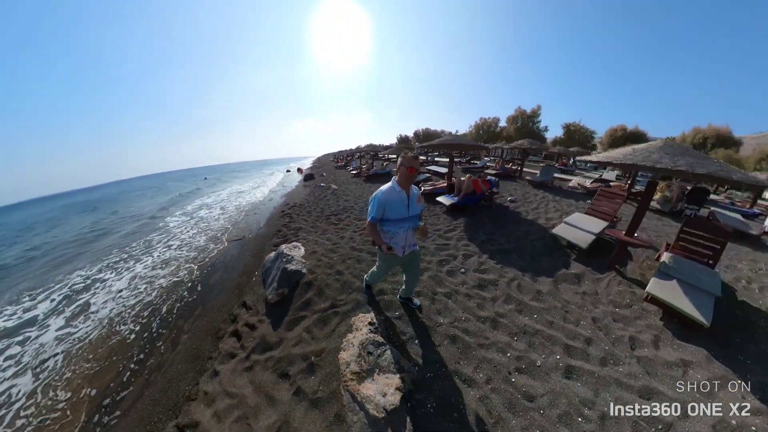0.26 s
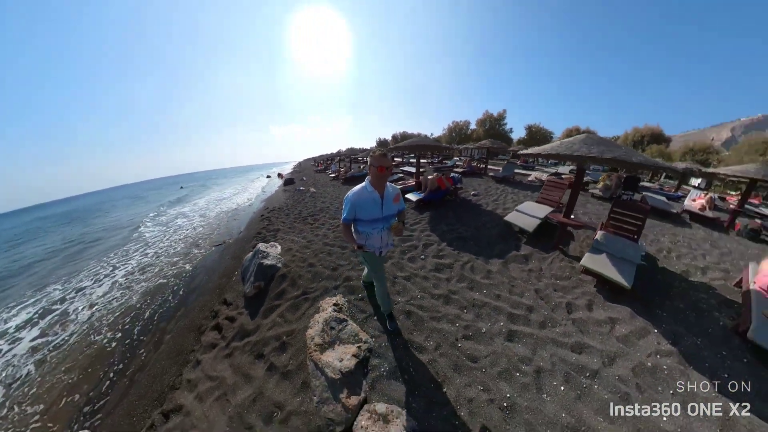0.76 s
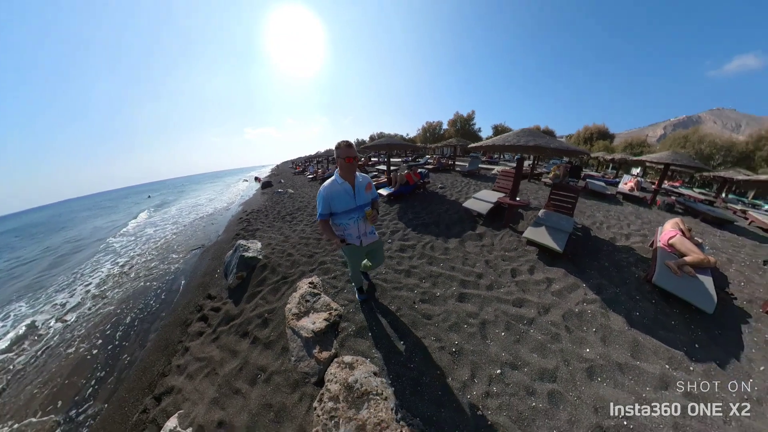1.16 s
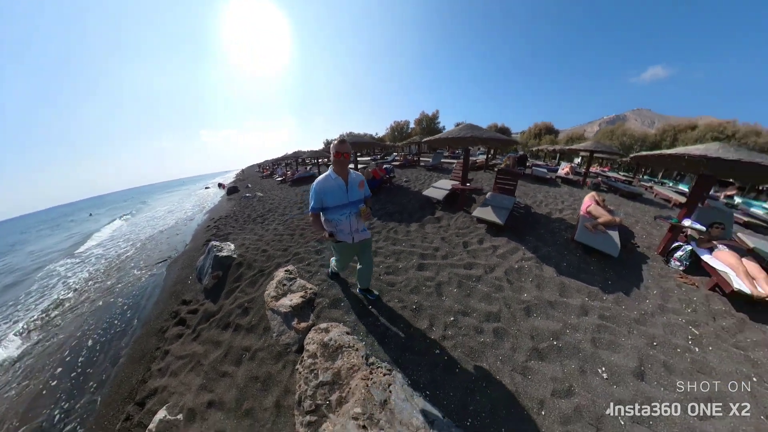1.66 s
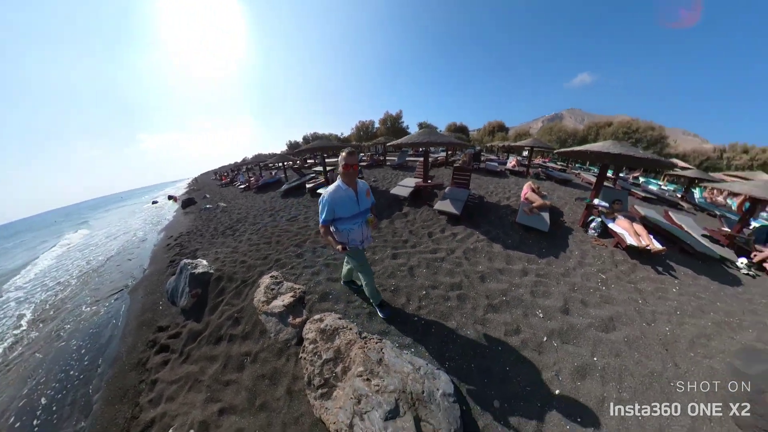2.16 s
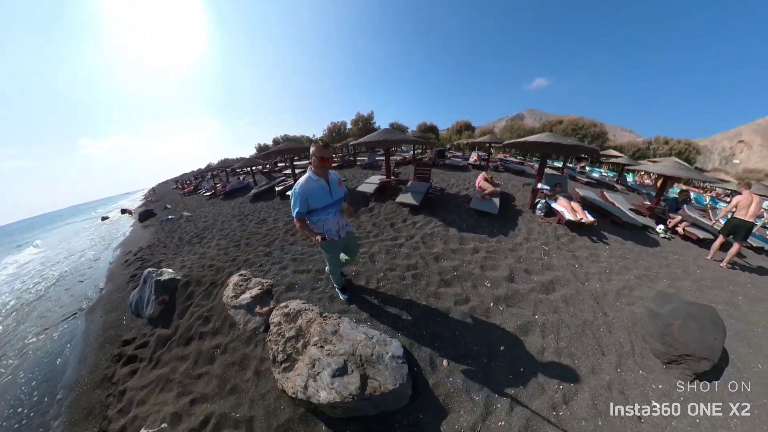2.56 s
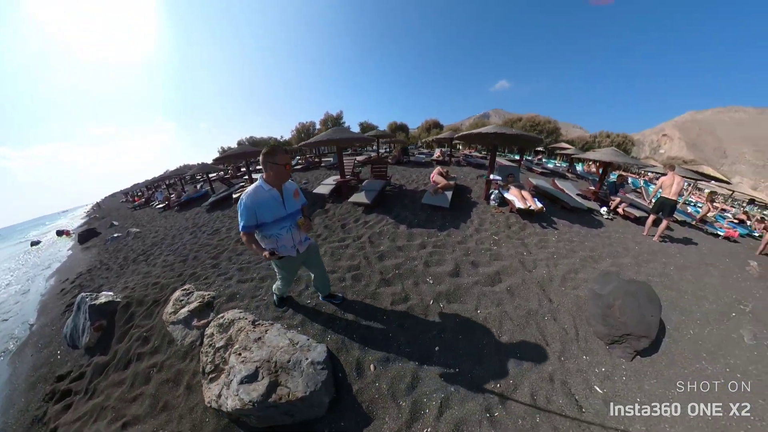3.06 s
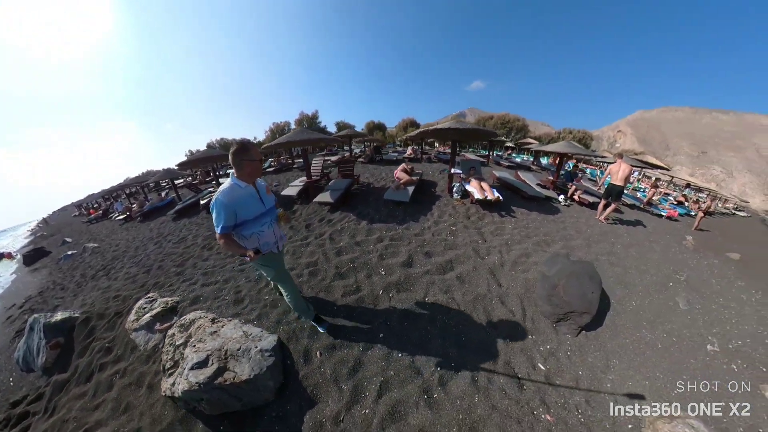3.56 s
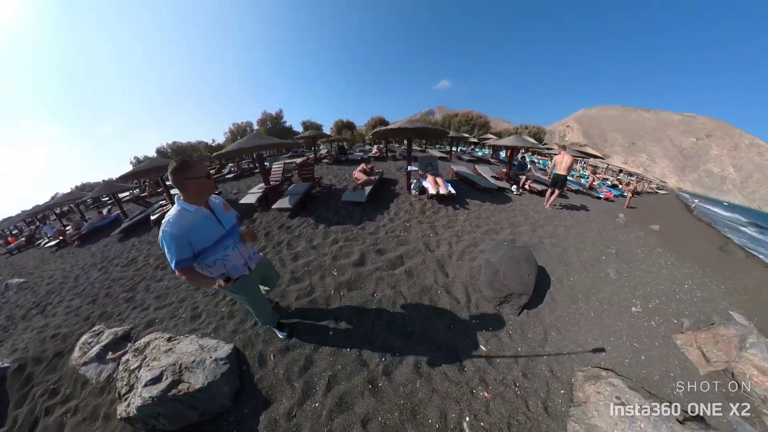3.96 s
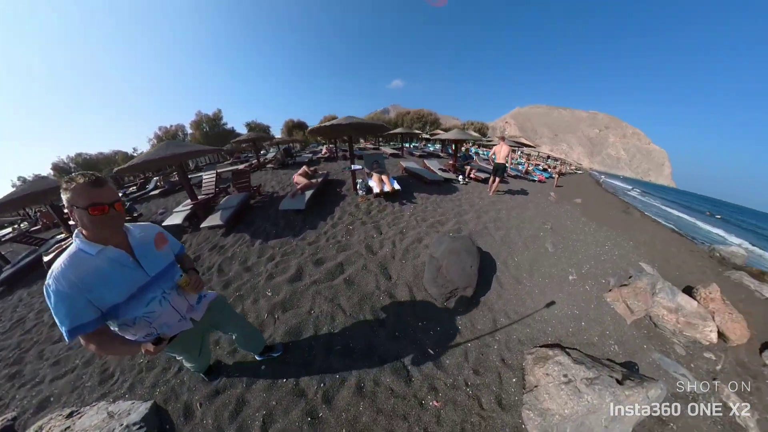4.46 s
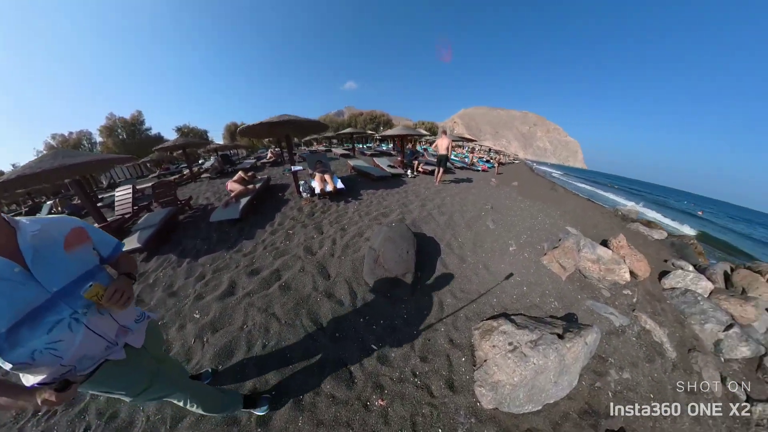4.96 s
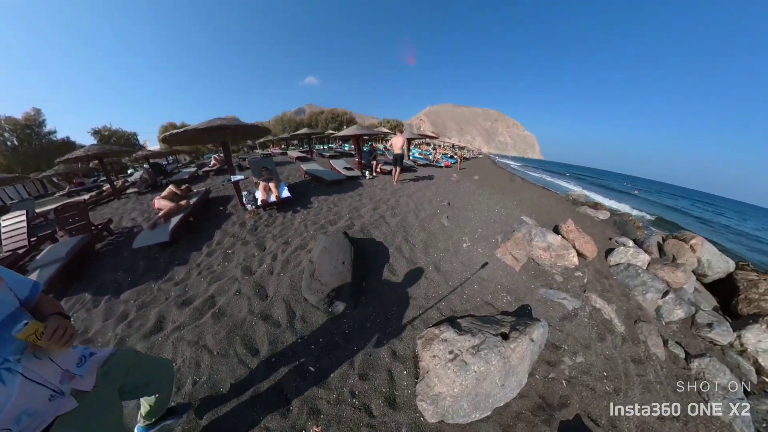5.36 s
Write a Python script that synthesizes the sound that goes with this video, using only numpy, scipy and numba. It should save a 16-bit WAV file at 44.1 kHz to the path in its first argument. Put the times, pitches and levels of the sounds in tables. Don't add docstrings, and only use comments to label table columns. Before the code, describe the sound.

On an open beach, waves wash close by with a continuous roar, foamy hiss, small bubbles and rattling stones. Wind rumbles low, with a hard pebble knock early on. Gusts grow into heavy thumps and slaps between two and three seconds, when the wide bright surf turns narrower and duller. Later gusts strike again, with faint sand ticks on the housing.

```python
import sys
import numpy as np
from scipy import signal
from scipy.fft import rfft, irfft, next_fast_len
from scipy.io import wavfile
from scipy.ndimage import uniform_filter1d
from numba import njit

SR = 44100
rng = np.random.default_rng(int(sys.argv[2]) if len(sys.argv) > 2 else 0)


def volts_from_db(level):
    exponent = np.asarray(level, float) / 20
    return 10 ** exponent


def store_wav(level_fs):
    pcm = np.round(np.clip(np.atleast_2d(level_fs), -1, 1) * 32767)
    wavfile.write(sys.argv[1], SR, pcm.T.astype(np.int16))


N = 246959
STEP, FRAME = 192, 1024
CONTROL_S = np.arange(N // STEP + 2) * STEP / SR

# time in seconds, level in dB, foam (bright froth on the roar) in dB.
WAVE = [(0, -44, -3.5), (.17, -47, -1.5), (.55, -43, -3.5), (.8, -43.5, 1.3), (1.3, -44.5, 0),
        (1.55, -45.5, 5), (1.68, -41, 3), (1.85, -40, 1.5), (2.15, -40.5, 2.5), (2.42, -41, 0.5),
        (2.54, -49.5, 3.1), (2.64, -43.5, -0.5), (2.8, -39.5, -6), (2.95, -42, -4), (3.2, -39.5, -3.5),
        (4.2, -43, 1), (5.35, -41.5, 1), (5.55, -40, 5.5)]
# time in seconds, level above the wave in dB, extra foam in dB.
SPLASHES = [(.22, 0.6, 1), (0.392, 1.5, 7.5), (.5, 0.8, 3), (.82, 0.3, 0), (1.015, 2, -1), (1.22, -1, 1.5),
            (1.38, 1.5, -1.7), (1.81, 3, -5), (1.96, 2.5, -3.1), (2.28, 1, -1.5), (2.13, 0.3, 1),
            (3.25, -1, 0.5), (3.56, -0.2, 1.5), (3.75, -0.4, 3), (4.33, 4, -2), (4.47, 2.1, 3),
            (4.77, 3.5, -3), (4.62, -0.4, 2.5), (4.98, 1, -1), (5.42, -0.3, 1.5), (5.575, 0.4, -1.5)]
SPLASH_S = 0.037
# low edge in Hz, high edge in Hz.
SURF_BANDS_HZ = [
    (450, 1000),
    (1200, 3000),
    (3800, 5600),
    (6500, 8500),
]
# roar, wash, fizz, spray above the wave in dB, through the open and the sheltered port.
OPEN_BANDS_DB = [.1, -7, -11.5, -18.5]
SHELTER_BANDS_DB = [-0.12, -10.5, -36.5, -22.5]
FOAM_GAIN = [0, 0.701, 0.949, 1.1]
# frequency in Hz, density in dB per Hz.
OPEN_COLOUR = [(180, -8), (300, -4), (318, -2.5), (509, -3.5), (547, -5.5), (596, -5), (750, -6.5),
               (817, -7), (1040, -10), (1310, -11.5), (2960, -16), (3370, -18), (6330, -19.5), (7960, -27),
               (9180, -45), (11900, -70.5), (20200, -120)]
# frequency in Hz, density in dB per Hz.
SHELTER_COLOUR = [(180, -9.5), (300, -0.5), (532, -1.5), (580, -3.5), (632, -2), (970, -8.5), (1850, -16.5),
                  (2260, -20), (3470, -32.5), (4360, -47), (5100, -49.5), (6510, -31.5), (7410, -28),
                  (8190, -34.5), (9180, -54), (11900, -90), (20200, -120)]
# low edge in Hz, high edge in Hz, share of time apart with ports open, same when sheltered.
WIDE_STRIPS = [(3050, 3400, .85, .5), (3400, 3750, .8, .08), (3750, 4100, .9, .05), (4100, 4500, .95, .8),
               (4500, 5050, .95, .7), (5050, 5600, .75, .08), (5600, 6250, .7, .02), (6250, 6900, .3, 0),
               (6900, 7600, .04, .1), (7600, 8400, .03, .01), (8400, 9500, .05, .03)]
OPEN_WIDE_DB, SHELTER_WIDE_DB, PATCH_S, STEREO_ENDS_S = -4, -7, .035, 2.92
SWITCH_S, SWITCH_DB_PER_S = 2.585, 28
# time in seconds, step in dB.
SHUTTER = [
    (2.72, -5.5),
    (2.8, -2.5),
    (2.885, -12),
    (2.94, -16),
]
SHUTTER_S = .03
# time in seconds, change in dB, length in seconds.
LULLS = [
    (.27, -11, 0.06),
    (3.745, -4, .03),
    (4.29, -8, 0.06),
    (4.485, -12, .03),
]
LULL_TOP_HZ = 261
# time in seconds, change in dB.
DUCKS = [
    (2.515, -2),
    (2.93, -3.5),
]
DUCK_ATTACK_S, DUCK_RELEASE_S, DUCK_ABOVE_HZ = 0.005, .07, 620

# frequency in Hz, density in dB per Hz.
WIND_COLOUR = [(8.8, -44), (15, -9), (32, 4.5), (54, 10), (122, -2.5), (251, -4.5), (348, -11.5),
               (450, -21), (580, -60), (990, -120)]
WIND_EDGES_HZ = [10, 85, 170, 380]
# time in seconds, level in dB, eddy speed in octaves above the slowest rumble.
BREEZE = [(0, -33.5, 0.27), (.15, -49, .3), (.45, -39.5, .7), (.72, -50.5, 2.4), (.9, -42, 0.38),
          (1.15, -35.5, 0.76), (1.75, -43.5, 0.96), (2.0, -34.5, 0.45), (2.22, -33.5, 1.14),
          (2.6, -28.5, 0.66), (3.05, -33.5, 0.57), (3.6, -33, 0.68), (3.76, -41.5, 1.37),
          (4.0, -37.5, 0.66), (4.21, -44, 0.033), (4.5, -39, 0.6), (4.72, -36, 0.76), (5.6, -31, 0.51)]
# time in seconds, peak in dB, length in seconds, eddy
GUSTS = [(0.057, -26, 0.065, 0.88), (0.247, -38, 0.14, .01), (0.412, -32, 0.048, 3),
         (1.03, -37, 0.065, 0.0085), (1.176, -26, 0.11, 0.71), (1.324, -36, 0.11, .3),
         (1.45, -33.5, 0.23, 0.99), (1.635, -28.5, 0.1, 0.7), (1.85, -29, 0.11, 0.86),
         (1.931, -25, 0.098, 1.23), (2.066, -28.5, 0.05, 1.74), (2.363, -24.5, 0.075, 1.35),
         (2.462, -23.5, .08, 2.4), (2.508, -23, 0.068, 1.64), (2.744, -24.5, 0.053, 0.48),
         (2.844, -25.5, 0.075, 1.3), (2.908, -20, 0.082, 0.48), (3.17, -24.5, 0.084, 0.0091),
         (3.363, -30.5, 0.11, 0.27), (3.48, -30, 0.053, .2), (3.85, -32, 0.17, 0.0089),
         (4.363, -30.5, 0.09, .01), (4.606, -22.5, 0.059, 1.55), (4.668, -23.5, .1, 0.51),
         (4.787, -26.5, 0.056, 0.42), (4.948, -25.5, 0.13, 0.85), (5.085, -36, 0.11, 0.29),
         (5.347, -27.5, 0.15, 0.83), (5.408, -28.5, 0.14, 0.75), (5.5, -31.5, 0.092, 0.52),
         (0.814, -28, 0.054, 3.6), (0.976, -48, .05, 0.88), (1.312, -37, 0.054, 2.1),
         (1.734, -30, 0.043, 0.82), (1.869, -30.5, 0.05, 3.3), (2.303, -32, 0.075, 1.7),
         (2.593, -27.5, 0.13, 3.2), (2.726, -32.5, 0.085, 2.1), (2.987, -21, 0.033, 0.64),
         (3.074, -32, 0.17, 1.7), (3.273, -36.5, 0.12, 2.2), (3.427, -31.5, 0.15, 3.27),
         (4.127, -42, 0.14, 2.3), (4.516, -33, 0.022, 1.2), (4.695, -29.5, .04, 2.3),
         (5.043, -28.5, 0.05, 2.9), (5.24, -32, 0.056, 1.9)]
LAYER_OCTAVES = [0.11, 1.187, 2.36]
LAYER_DB = [0.8, 0.8, 1.9]
SPEED_FOCUS_DB, GUST_RISE = 7, 0.42

# time in seconds, peak in dB, pitch in Hz.
THUMPS = [(0.03, -9.5, 97), (1.172, -12, 95), (1.202, -24, 105), (1.296, -10, 86), (4.36, -16, 60),
          (1.417, -9, 92), (1.607, -8, 104), (1.924, -26, 98), (2.438, -1, 116), (2.732, -8, 85),
          (2.886, -4.5, 80), (2.912, -4.5, 90), (2.827, -2, 90), (2.965, -30, 87), (4.507, -17, 79),
          (4.596, -12, 199), (4.947, -3, 75), (5.333, -4.5, 117), (5.419, -6, 96)]
# time in seconds, peak in dB, pitch of the push in Hz.
KNOCKS = [
    (.2165, -31, 600),
    (0.3946, -13, 440),
]
# time in seconds, peak in dB, pitch in Hz.
PLOPS = [
    (1.0105, -27, 570),
    (4.325, -31, 520),
]
# time in seconds, peak in dB, pitch in Hz.
SLAPS = [(2.064, -17, 180), (2.346, -15, 207), (2.389, -20, 172), (2.446, -25, 172), (2.47, -22, 205),
         (2.503, -27, 172), (2.545, -14, 215), (2.582, -14.5, 234), (2.634, -21.5, 172),
         (2.844, -12.5, 205), (4.606, -15, 175), (4.694, -24, 172), (4.817, -16, 140), (4.952, -22, 150),
         (5.022, -19.5, 190), (5.076, -21, 190), (5.232, -22, 190), (5.294, -16.5, 180), (5.338, -17, 178)]
# time in seconds, peak in dB, pitch in Hz.
GRIT = [(3.5223, -50.5, 7000), (3.6558, -58, 6930), (4.0498, -54.5, 7000), (4.2163, -45, 7540),
        (4.2995, -44.5, 7750), (4.318, -48, 6670), (4.416, -49, 7340), (4.452, -45.5, 6950),
        (4.7496, -43, 6920), (4.923, -59, 7450), (5.242, -54, 7560), (5.3105, -46, 7760),
        (5.347, -47, 7170), (5.5622, -34, 7340)]


def unit(x):
    return x / np.sqrt(np.mean(x ** 2))


def curves(table):
    s, *columns = np.transpose(table)
    return [np.interp(CONTROL_S, s, column) for column in columns]


def full(control):
    return np.interp(np.arange(N) / STEP, np.arange(len(control)), control)


def colour(points, hz):
    point_hz, db = np.transpose(points)
    return volts_from_db(np.interp(np.log(hz + 1), np.log(point_hz), db))


def walk(rate_hz):
    k = max(int(SR / STEP / rate_hz), 2)
    held = np.repeat(rng.standard_normal(N // STEP // 2 + 2), k)[:N // STEP + 2]
    return 0.39 * uniform_filter1d(uniform_filter1d(held, k), k)


def bumps(s, rise_s, fall_s):
    late_s = CONTROL_S - s[:, None]
    return np.exp(-(late_s / np.where(late_s < 0, rise_s, fall_s)) ** 2)


def bands(lo_hz, hi_hz, per_octave, hz):
    for centre_hz in lo_hz * 2 ** np.arange(0, np.log2(hi_hz / lo_hz), 1 / per_octave):
        offset = np.clip(per_octave * np.log2((hz + 1) / centre_hz), -1, 1)
        yield centre_hz, np.cos(np.pi / 2 * offset)


def shaped(x, gain):
    frames = signal.stft(x, nperseg=FRAME, noverlap=FRAME - STEP)[2]
    count = min(frames.shape[1], gain.shape[1])
    return signal.istft(frames[:, :count] * gain[:, :count], nperseg=FRAME, noverlap=FRAME - STEP)[1][:N]


@njit
def grains(start, hz, cycles, size, glide, length):
    out = np.zeros(length)
    for k in range(len(start)):
        n = int(6 * cycles[k] * SR / hz[k])
        w, z = 2 * np.pi * hz[k] / SR, size[k] + 0j
        damp = np.exp(-hz[k] / (cycles[k] * SR))
        for i in range(start[k], min(start[k] + n, length)):
            out[i] += z.imag
            z *= damp * np.exp(1j * w)
            w *= 1 + glide / n
    return out


def swarm(count, lo_hz, hi_hz, cycles, spread_db, glide):
    when, where, luck = rng.random((count, 3)).T
    hz = lo_hz + (hi_hz - lo_hz) * where
    size = volts_from_db(-spread_db * np.log(1 - luck)) * np.sqrt(hz / hi_hz)
    return unit(grains((when * N).astype(np.int64), hz, np.full(count, cycles), size, glide, N))


def hits(table, cycles, glide):
    s, db, hz = np.transpose(table)
    return grains((s * SR).astype(np.int64), hz, np.full(len(s), cycles), volts_from_db(db), glide, N)


def water():
    bubbles = swarm(count=9000, lo_hz=300., hi_hz=3500., cycles=2.5, spread_db=1.5, glide=.25)
    stones = swarm(count=16000, lo_hz=1500., hi_hz=9000., cycles=1.2, spread_db=2.2, glide=0.)
    return rng.standard_normal(N) + 0.17 * bubbles + 0.18 * stones


def wave_db(bands_db):
    s, *splash_db = np.transpose(SPLASHES)
    level_db, froth_db = np.array(curves(WAVE)) + np.array(splash_db) @ bumps(s, SPLASH_S, SPLASH_S)
    return level_db + np.array(bands_db)[:, None] + np.outer(FOAM_GAIN, froth_db)


def port(points, bands_db, hz):
    shape = colour(points, hz)
    own_db = [[10 * np.log10(np.sum(shape[(hz > lo) & (hz < hi)] ** 2) / len(hz))]
              for lo, hi in SURF_BANDS_HZ]
    centres = np.log([np.sqrt(lo * hi) for lo, hi in SURF_BANDS_HZ])
    blend = np.array([np.interp(np.log(hz + 1), centres, row) for row in np.eye(len(centres))]).T
    return shape[:, None] * volts_from_db(blend @ (wave_db(bands_db) - own_db))


def open_share():
    steps_db = sum(db * np.clip((CONTROL_S - s) / SHUTTER_S, 0, 1) for s, db in SHUTTER)
    return volts_from_db(steps_db - SWITCH_DB_PER_S * np.maximum(CONTROL_S - SWITCH_S, 0)) ** 2


def foam_db(hz):
    out, drift, splash = 0, walk(9), walk(28)
    for centre_hz, mask in bands(240, 11000, 4, hz):
        drift = .8 * drift + .6 * walk(9)
        high = centre_hz / 8000
        flicker = .5 * drift + (0.19 + 1.6 * high) * walk(22)
        flicker = flicker + 1.2 * high ** 4 * walk(45) + 2.2 * high * splash
        out = out + np.outer(mask ** 2, flicker)
    return out


def dips_db(hz):
    s, db, length_s = np.transpose(LULLS)
    lull_db = db @ bumps(s, length_s[:, None], length_s[:, None])
    s, db = np.transpose(DUCKS)
    duck_db = db @ bumps(s, DUCK_ATTACK_S, DUCK_RELEASE_S)
    return np.outer(1 / (1 + (hz / LULL_TOP_HZ) ** 8), lull_db) + np.outer(hz > DUCK_ABOVE_HZ, duck_db)


def surf():
    hz = np.arange(FRAME // 2 + 1) * SR / FRAME
    share = open_share()
    open_power = share * port(OPEN_COLOUR, OPEN_BANDS_DB, hz) ** 2
    shelter_power = (1 - share) * port(SHELTER_COLOUR, SHELTER_BANDS_DB, hz) ** 2
    wave = np.sqrt(open_power + shelter_power)
    both = CONTROL_S < STEREO_ENDS_S
    patch = max(int(PATCH_S * SR / STEP), 4)
    apart, uneven_db = np.zeros(wave.shape), np.zeros(wave.shape)
    for lo, hi, open_odds, shelter_odds in WIDE_STRIPS:
        draws = rng.random((2, N // STEP // 4 + 2))
        luck, size = (np.repeat(u, patch)[:len(share)] for u in draws)
        strip = (hz > lo) & (hz <= hi)
        apart[strip] = luck < np.where(both, open_odds, shelter_odds)
        uneven_db[strip] = size - .5
    wide_db = np.where(both, OPEN_WIDE_DB, SHELTER_WIDE_DB)
    thin_db = np.where(hz < 6900, 1.6, 9.)
    level_db = (0.5 + 0.093 * share) * foam_db(hz) + 8.1 * share * uneven_db + dips_db(hz)
    mid = shaped(water(), wave * volts_from_db(level_db - thin_db[:, None] * apart))
    side = shaped(rng.standard_normal(N), wave * apart * volts_from_db(wide_db))
    return mid, side


def gusts():
    s, peak_db, length_s, speed = np.transpose(GUSTS)
    bells = bumps(s, GUST_RISE * length_s[:, None], (1 - GUST_RISE) * length_s[:, None]) ** 2
    breeze_db, breeze_speed = curves(BREEZE)

    def power(db, octaves):
        return volts_from_db(db - SPEED_FOCUS_DB * octaves ** 2) ** 2

    layers_db = []
    for at, db in zip(LAYER_OCTAVES, LAYER_DB):
        total = power(breeze_db, breeze_speed - at) + power(peak_db, speed - at) @ bells
        layers_db.append(db + 10 * np.log10(total))
    rumble_db, buffet_db, flap_db = layers_db
    return rumble_db, buffet_db - rumble_db, flap_db - rumble_db


def wind():
    size = next_fast_len(N)
    hz = np.arange(size // 2 + 1) * SR / size
    rumble_db, buffet_db, flap_db = gusts()
    eddies = swarm(count=700, lo_hz=24.5, hi_hz=365.0, cycles=0.9, spread_db=1.8, glide=-0.38)
    air = rfft(eddies + rng.standard_normal(N) * volts_from_db(10.5), size)
    air = air / uniform_filter1d(np.abs(air), size=301) * colour(WIND_COLOUR, hz)
    out, flutter = 0, walk(14)
    layers = ((-0.5, -3.2, -3.1, -1.0), (buffet_db - 3.0, 1.1, .9, 18), (flap_db - 4.5, 1.8, 1.9, 30))
    for lo, hi, (above_db, shared_db, own_db, rate_hz) in zip(WIND_EDGES_HZ, WIND_EDGES_HZ[1:], layers):
        slopes = np.sqrt((1 + (lo / (hz + 1)) ** 12) * (1 + (hz / hi) ** 12))
        part = unit(irfft(air / slopes, size)[:N])
        slow_power = uniform_filter1d(part ** 2, size=int(3 * SR / hi) + 1200)
        part = unit(part / (slow_power + .05) ** .4)
        out = out + part * full(volts_from_db(rumble_db + above_db + shared_db * flutter + own_db * walk(rate_hz)))
    return out


def thumps():
    rings = hits(THUMPS, 0.94, -0.047)
    return volts_from_db(-7.5) * uniform_filter1d(uniform_filter1d(rings, size=70), size=70)


def knocks():
    tick = hits(np.array(KNOCKS) * [1, 1, 10], 1.2, 0.)
    body = hits(np.array(KNOCKS) * [1, 1, 3.6], 1.5, .6)
    push = np.roll(hits(KNOCKS, .9, 0.), 35)
    knock = volts_from_db(-14) * tick + volts_from_db(-9) * body - volts_from_db(-4) * push
    return uniform_filter1d(knock, size=3)


def plops():
    return uniform_filter1d(hits(PLOPS, 3.1, .1), size=3)


def slaps():
    rings = hits(SLAPS, 1.0, 0.13)
    return volts_from_db(1) * uniform_filter1d(uniform_filter1d(rings, size=36), size=36)


def grit():
    high = signal.butter(4, 6000, "high", fs=SR, output="sos")
    return volts_from_db(2.0) * signal.sosfilt(high, hits(GRIT, 3., 0.))


def scene():
    mid, side = surf()
    mid = mid + wind() + thumps() + knocks() + plops() + slaps() + grit()
    return np.array([mid + side, mid - side])


def top_cut(x):
    return signal.sosfilt(signal.butter(12, 9330, fs=SR, output="sos"), x)


def record(dry):
    top = signal.butter(8, 9200, fs=SR, output="sos")
    bass = uniform_filter1d(dry, size=41, axis=1)
    limited = dry - bass + .33 * np.tanh(bass / .33)
    return top_cut(signal.sosfilt(top, limited))


dry = scene()
out = record(dry)
store_wav(out)
```